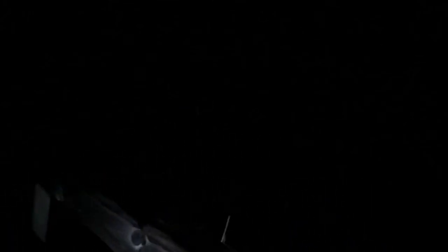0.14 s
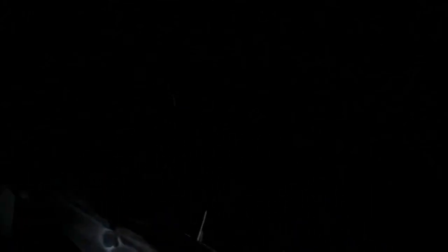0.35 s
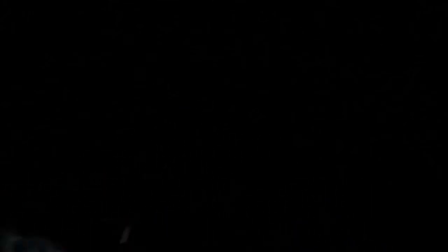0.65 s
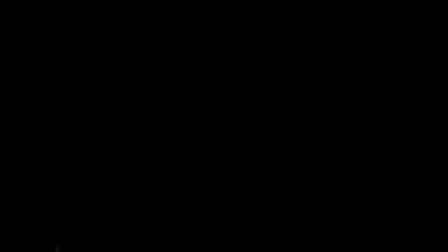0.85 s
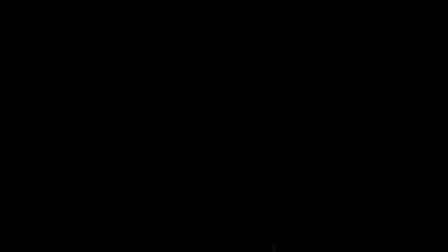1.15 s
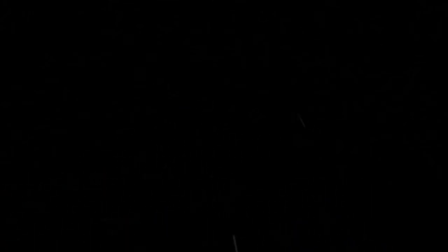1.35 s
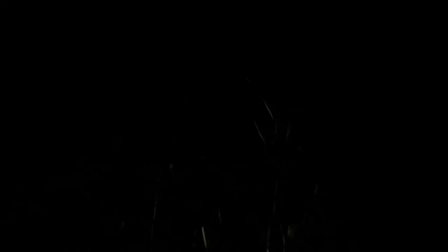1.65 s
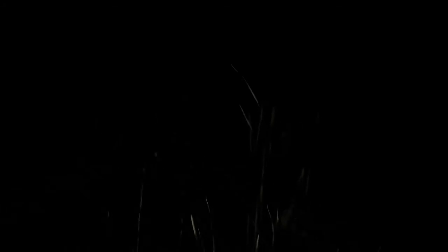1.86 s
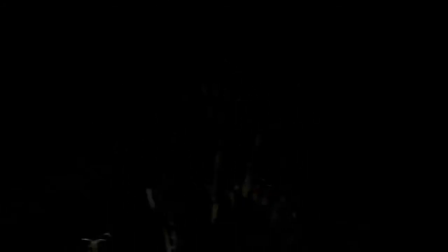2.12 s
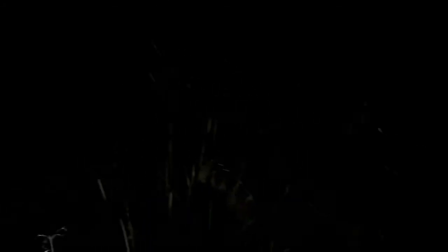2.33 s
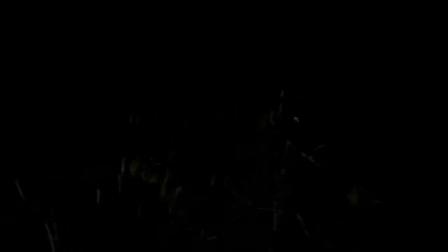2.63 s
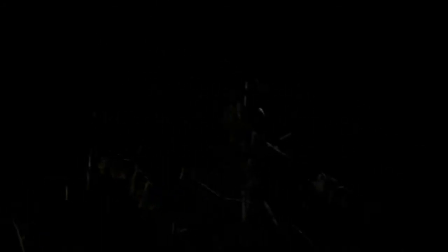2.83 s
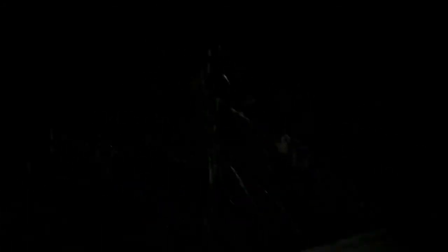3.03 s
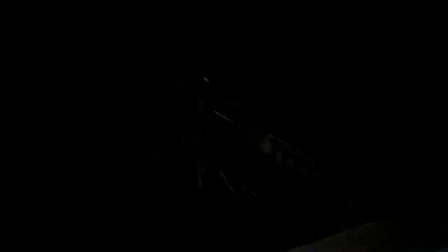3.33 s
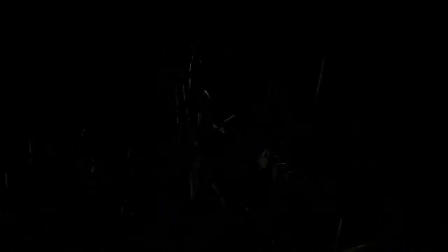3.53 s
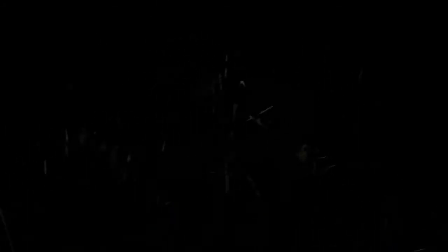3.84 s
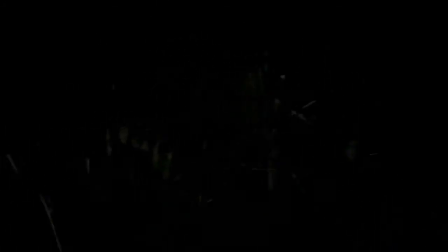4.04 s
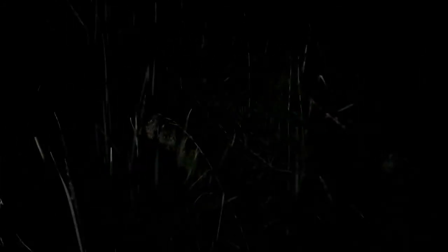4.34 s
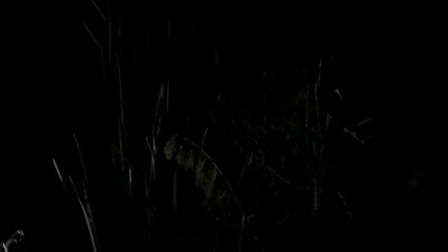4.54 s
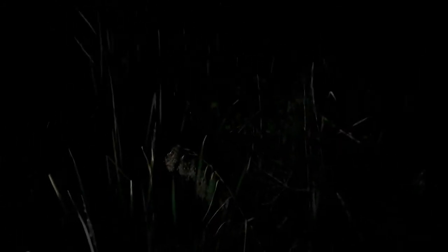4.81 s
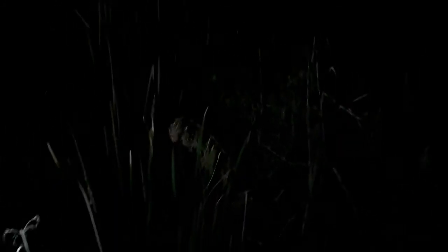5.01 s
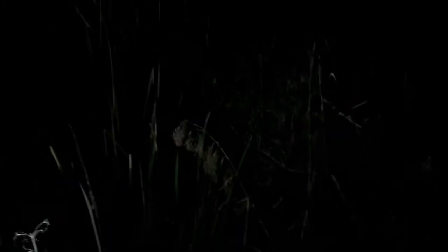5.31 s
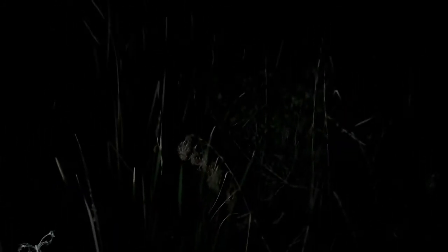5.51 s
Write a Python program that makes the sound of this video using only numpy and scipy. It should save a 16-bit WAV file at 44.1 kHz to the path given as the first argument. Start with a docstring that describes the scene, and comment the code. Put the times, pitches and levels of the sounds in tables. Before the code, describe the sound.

A close, dry, handheld night recording in tall grass and brush. At 0 to 0.2 seconds a bright stem snap and a weaker one crack through a short rustle, over shrill pulsing crickets that then sink away. Faint scrapes and soft bumps follow around 0.7 to 1.2, with a small crack and thud at 1.3. At 1.7 comes the loudest event, a tight burst of sharp splintering snaps, grass fizz and a low jolt, with another cluster at 1.93. Crickets surge up around it. From 2.1 to 2.8 only small knocks and hand rumble. Light straw ticks and scraping start at 3.1; a woody knock with a thud and crunch lands at 3.5, smaller ticks at 3.74. Small snaps come at 4.0, and a dull low distant rush swells at 4.2 to 4.5. Crickets thin out near 5.2; a faint tick at 4.9 and a last small snap at 5.3.

```python
"""Someone steps through tall grass and brush at night with a camera in hand: dry stems snap, twigs knock and
scrape, straw ticks, feet and hands thud. Each hit is a short blow of noise and echoes ringing in a body filter.
Shaped noise makes the rustle of leaves and grass and the rumble of the hand on the camera. Behind, pulsed tones
make four near crickets and a far chorus, and shaped noise a low distant rush and still air.
The camera's noise suppressor holds this background down and lets it surge after each close sound."""
import sys
import numpy as np
from scipy import signal
from scipy.fft import rfft, irfft, next_fast_len
from scipy.io import wavfile
from scipy.ndimage import uniform_filter1d

SR = 44100
rng = np.random.default_rng(int(sys.argv[2]) if len(sys.argv) > 2 else 0)


def unload_wav(signal):
    """Save mono or channel-first audio to the path in sys.argv[1] as 16-bit WAV at rate SR, clipped to [-1, 1]."""
    wavfile.write(
        sys.argv[1],
        SR,
        np.round(np.clip(np.atleast_2d(signal).T, -1, 1) * 32767).astype(np.int16),
    )


N = 249914
TIME = np.arange(N) / SR


def amp(db):
    """Turns decibels into a gain."""
    return 10 ** (np.asarray(db) / 20)


def unit(x):
    """Scales a signal to an average (rms) strength of 1."""
    return x / np.sqrt(np.mean(x ** 2) + 1e-20)


def curve(table):
    """Joins the (time, value) rows of a table by straight lines."""
    times, values = np.transpose(table)
    return np.interp(TIME, times, values)


def shape(points, hz):
    """Reads a table of (frequency, level) at any frequency, on a log-frequency axis."""
    point_hz, point_db = np.transpose(points)
    return np.interp(np.log(hz + 1), np.log(point_hz + 1), point_db)


def add(mix, start_s, sound):
    """Mixes a sound in at its start time."""
    part = mix[max(round(start_s * SR), 0):][:len(sound)]
    part += sound[:len(part)]


def coloured(x, points):
    """Weights the frequencies of a signal by a table, at rms 1."""
    size = next_fast_len(N, True)
    gain = amp(shape(points, np.fft.rfftfreq(size, 1 / SR)))
    return unit(irfft(rfft(x, size) * gain, size)[:N])


def band(centre_hz, width_hz):
    """Makes noise in one bell-shaped band; around zero it is a slow wander."""
    size = next_fast_len(N, True)
    offset = (np.fft.rfftfreq(size, 1 / SR) - centre_hz) / width_hz
    bell = np.exp(-2 * np.minimum(offset ** 2, 20))
    return unit(irfft(rfft(rng.standard_normal(size)) * bell, size)[:N])


def ring(x, gain_db, size=4096):
    """Filters a blow through a body that answers only after it is struck (minimum phase)."""
    log_gain = np.log(amp(np.maximum(gain_db, -100)))
    mirrored = np.r_[log_gain, log_gain[-2:0:-1]]
    response = np.fft.ifft(np.exp(np.conj(signal.hilbert(mirrored)))).real
    return signal.fftconvolve(x, response[:size // 2])


def overtones(size, spacing_hz=450, uneven_db=4.5):
    """Gives every struck body its own uneven row of resonances, in dB over frequency."""
    knots = np.arange(size // 2 + 1) * SR / size / spacing_hz
    places = np.interp(knots, np.arange(200), np.arange(200) + rng.random(200))
    return uneven_db * np.cos(2 * np.pi * places)


# echoes from the hand and things close by: (delay_s, share of the pressure)
ECHOES = [(0, 1), (.00052, .5), (.0017, .17), (.0027, -.13), (.0037, .1)]


def hits(rows, body, main_hz, side_hz, ring_db, ring_octaves, splinter, splinter_t60, tail_db, tail_t60, size=4096):
    """Each hit is a sharp impulse with close echoes, a burst of splintering and a tail, all ringing in the body."""
    hz = np.fft.rfftfreq(size, 1 / SR)
    t = np.arange(2 * size) / SR
    out = np.zeros(N)
    main, side = ((hz > low) & (hz < high) for low, high in (main_hz, side_hz))
    reach = uniform_filter1d(side * 1., size=41)  # the side band with soft edges
    for start_s, peak_db, ring_hz, side_db in rows:
        octaves_off = np.log2((hz + 1) / ring_hz)
        peak = ring_db * np.exp(-.5 * (octaves_off / ring_octaves) ** 2)
        colour_db = shape(body, hz) + overtones(size) + peak
        # thick and thin stems differ in how much sounds outside their main ring
        power = amp(colour_db) ** 2
        present_db = 10 * np.log10(power[side].sum() / power[main].sum())
        colour_db = colour_db + reach * np.clip(side_db - present_db, -12, 6)

        # each noise burst falls by 60 dB in its t60, in seconds
        t60 = np.array([[splinter_t60], [tail_t60]])
        fibres, tail = rng.standard_normal((2, len(t))) * np.exp(-np.log(1000) * t / t60)
        blow = splinter * fibres / np.linalg.norm(fibres)
        blow += amp(tail_db) * tail / np.linalg.norm(tail)
        for delay_s, share in ECHOES:
            add(blow, delay_s, np.array([share]))

        sound = ring(blow, colour_db)
        crest = np.sqrt(2 * uniform_filter1d(sound ** 2, size=32).max())  # height of the loudest few swings
        add(out, start_s, amp(peak_db) * sound / crest)
    return out


# dry stems snapping: (start_s, peak_db before the layer level, ring_hz, wanted low thud_db against the ring)
SNAPS = [(0.0175, -7.5, 5870, -17.5), (0.172, -17.5, 5630, -15.5), (0.1882, -30, 5550, 3),
         (1.2795, -27, 5050, -8), (1.3209, -35.5, 5500, 0), (1.7274, 0, 5314, -20), (1.7387, -8, 7200, -15),
         (1.7415, -14, 5230, -7), (1.7491, -14.5, 5840, -15), (1.928, -15.5, 5370, -18),
         (1.9363, -27, 4800, -10), (1.9559, -22, 6900, -9), (4.001, -23, 4450, -24),
         (4.0039, -32, 5230, -16), (5.3261, -28, 4400, -20.5)]
# how a snapping stem colours the blow: (pitch_hz, level_db per Hz)
SNAP_BODY = [(60, -26.5), (250, -22), (500, -21), (900, -3.5), (1500, -17), (2500, -13.5), (3200, -7.5),
             (3850, -3.5), (4400, -4), (5150, 3.5), (6200, -10.5), (7000, -5), (8200, -12), (9000, -34),
             (12000, -42.5), (16000, -51)]


def snaps(level_db=-0.5, warning_db=-25, warning_s=0.0027):
    """A stem gives a faint crack just before it breaks with a bright ring."""
    breaks = hits(SNAPS, SNAP_BODY, main_hz=(3000, 9000), side_hz=(300, 2000), ring_db=8, ring_octaves=.25,
                  splinter=.3, splinter_t60=.014, tail_db=-13.5, tail_t60=0.1)
    warnings = amp(warning_db) * np.roll(breaks, -round(warning_s * SR))  # faint early copies
    return amp(level_db) * (breaks + warnings)


# twigs knocking: (start_s, peak_db, ring_hz, wanted crack_db against the ring)
KNOCKS = [(0.673, -52.5, 1400, -16), (1.006, -51, 1110, 3), (1.1515, -46, 750, 1), (1.279, -28, 820, -20.5),
          (1.542, -53, 870, -35), (1.709, -40, 930, 10), (1.747, -26, 800, -9.5), (1.832, -46, 890, -12),
          (1.855, -45, 765, -15), (1.863, -38, 750, -7), (2.109, -44, 1440, 6), (2.3185, -42.5, 1870, 4.5),
          (3.216, -44, 1320, 2), (3.425, -53.5, 1390, -8), (3.515, -24.5, 933, -20), (3.746, -49, 954, 4)]
# how a twig colours the blow: (pitch_hz, level_db per Hz)
KNOCK_BODY = [(60, -20), (250, -4), (450, -14), (900, 5), (1300, -1), (2000, -5), (2800, -15.5),
              (4000, -5.5), (5500, -14), (8000, -36), (10000, -51)]


def knocks():
    """Thicker twigs ring lower and longer."""
    return hits(KNOCKS, KNOCK_BODY, main_hz=(500, 2600), side_hz=(3000, 5000), ring_db=8, ring_octaves=0.15,
                splinter=1.8, splinter_t60=.035, tail_db=0.5, tail_t60=0.083)


# straw ticking: (start_s, peak_db before the layer level, ring_hz, wanted lower crack_db against the ring)
TICKS = [(0.1423, -45, 7140, 15), (0.2894, -47.5, 9250, -12), (0.951, -62, 11700, -4.5),
         (1.1515, -48, 6400, 4), (1.678, -46, 6720, -17), (1.7495, -17, 10560, -7),
         (1.8394, -34, 11600, -11), (1.8621, -33, 6760, -16), (1.9634, -20.5, 7600, 1.5),
         (1.9757, -39.5, 9380, -17), (2.155, -47.5, 6850, -24), (2.2546, -53, 6620, -30.5),
         (2.4618, -52, 6550, -14.5), (3.0734, -40.5, 7530, 0), (3.0861, -35.5, 8000, -4),
         (3.1038, -33.5, 7160, -19.5), (3.1686, -45.5, 6560, 8), (3.2169, -37.5, 9900, -8),
         (3.5384, -36, 8110, -18), (3.5444, -38, 6560, -16), (3.5564, -31.5, 7710, -4),
         (3.5712, -37.5, 9300, 7), (3.736, -47, 6600, 2), (3.7452, -33.5, 6200, 3), (3.7648, -42, 6620, -6),
         (4.0414, -50, 6570, -0.5), (4.0572, -43.5, 6470, 2.5), (4.134, -51, 6520, -6.5),
         (4.1458, -47, 6860, -10), (4.5055, -58, 6800, -18.5), (4.816, -67, 4600, 5),
         (4.8805, -53, 6660, -13.5), (4.9015, -49, 6690, -15)]
# how straw colours the blow: (pitch_hz, level_db per Hz)
TICK_BODY = [(300, -27.5), (1500, -26.5), (3200, -3), (4500, 3), (6500, 0), (8200, -9.5), (9500, -10),
             (12500, -15.5), (15000, -26.5)]


def ticks(level_db=-2):
    """Thin straw ticks briefly and brightly."""
    sound = hits(TICKS, TICK_BODY, main_hz=(6500, 14000), side_hz=(2000, 4600), ring_db=8, ring_octaves=0.2373,
                 splinter=1.0, splinter_t60=0.0054, tail_db=-13.0, tail_t60=0.079)
    return amp(level_db) * sound


# soft thuds of feet and hands: (start_s, peak_db before the layer level, ring_hz, wanted knock_db against the ring)
THUDS = [(0.169, -41.5, 227, -2), (1.005, -53, 236, -8), (1.279, -42.5, 276, -4), (1.374, -47, 280, -1),
         (1.689, -47.5, 231, -12), (1.725, -31.5, 270, 3), (1.857, -37, 236, -18), (1.923, -38.5, 225, -3),
         (1.955, -37.5, 388, 5), (2.334, -51, 299, -6), (2.762, -54, 310, -15), (3.166, -62, 397, -5),
         (3.478, -44.5, 379, -18), (3.517, -34, 198, 3), (3.632, -42, 237, -20.5), (3.736, -43.5, 227, -5)]
# how soft ground colours the blow: (pitch_hz, level_db per Hz)
THUD_BODY = [(60, -14.5), (140, -6.5), (220, 1), (380, -6), (560, -9.5), (900, -13.5), (1500, -30.5),
             (4000, -52.5)]


def thuds(level_db=-2):
    """Weight comes down on soft ground: a low, lumpy ring."""
    sound = hits(THUDS, THUD_BODY, main_hz=(150, 450), side_hz=(600, 1200), ring_db=9.5, ring_octaves=0.39,
                 splinter=1.9, splinter_t60=0.048, tail_db=0.0, tail_t60=.16)
    return amp(level_db) * sound


# twigs scraping past: (start_s, length_s, level_db before fade and judder, pitch_hz, width_hz)
SCRAPES = [(0.669, 0.11, -72.5, 1620, 497), (0.818, 0.52, -79.5, 1150, 330), (1.017, 0.26, -65, 1070, 380),
           (1.003, 0.45, -76, 3510, 600), (1.163, 0.56, -66, 880, 450), (1.39, 0.11, -65.5, 6630, 900),
           (1.67, 0.36, -58.5, 800, 1090), (1.849, 0.083, -53.5, 700, 1410),
           (2.313, 0.14, -66.5, 1321, 2230), (2.5, 0.46, -83, 2104, 220), (3.06, 0.34, -67.5, 2950, 900),
           (4.535, 0.082, -75, 4406, 1403), (4.879, 0.089, -59, 6080, 1200)]


def scrapes(judder_db=3, rise=0.023):
    """A twig catches, then sticks and slips ever more lightly as it slides by, sounding in one band."""
    total = 0
    for start_s, length_s, level_db, pitch_hz, width_hz in SCRAPES:
        progress = (TIME - start_s) / length_s  # 0 at the start, 1 at the end
        pressure = np.interp(progress, [0, rise, .5, 1], [0.02, 0.89, 0.32, 0])
        total = total + amp(level_db) * pressure * band(pitch_hz, width_hz)
    return total * amp(judder_db * band(0, 150))


# pushes through the brush, levels before the layer gains:
# (start_s, length_s, leaves_db, dry grass_db, jolt of the camera_db)
PUSHES = [(0.017, 0.21, -65, -68.5, -58), (0.666, 0.023, -86.5, -89, -63.5), (0.98, 0.17, -79, -105, -67),
          (1.276, 0.056, -65, -92, -58.5), (1.707, 0.088, -62.5, -59, -50.5),
          (1.925, 0.039, -60, -58.5, -50.5), (2.127, 0.06, -76, -80, -71.5),
          (2.333, .02, -73.5, -99, -58.5), (3.088, 0.21, -80.5, -77.5, -65.5),
          (3.51, 0.078, -61, -69.5, -48), (3.732, 0.029, -71.5, -72, -60.5),
          (4.004, 0.039, -74.5, -75, -76), (4.137, .02, -83, -78, -60), (4.883, 0.022, -102, -84, -70),
          (5.324, 0.032, -78, -79, -72.5)]
PUSH_RISE_DB_PER_S = 648.5


def pushed(column, fall_db_per_s):
    """Gain of one layer: each push sets in quickly, lasts a moment and dies away evenly in dB."""
    power = 0
    for start_s, length_s, *levels_db in PUSHES:
        early_s = np.maximum(start_s - TIME, 0)
        late_s = np.maximum(TIME - start_s - length_s, 0)
        level_db = levels_db[column] - PUSH_RISE_DB_PER_S * early_s - fall_db_per_s * late_s
        power = power + amp(level_db) ** 2
    return np.sqrt(power)


def crinkle(per_s, spread_db, smooth):
    """Many tiny slips of uneven size come over a smooth rubbing noise."""
    slip_size = amp(spread_db * np.minimum(rng.exponential(1, N), 4))
    happens = rng.random(N) < per_s / SR
    slips = rng.standard_normal(N) * slip_size * happens
    return unit(slips) + smooth * rng.standard_normal(N)


# colour of the rustling leaves: (pitch_hz, level_db per Hz)
LEAVES = [(100, -4), (250, 10), (500, 4.5), (900, 12.5), (1300, 4), (2000, -3.5), (3000, -6), (4200, 2),
          (6000, -2.5), (7500, -17.5), (9000, -34)]


def leaf_rustle(level_db=6):
    """Leaves rub past with each push, slipping often."""
    noise = coloured(crinkle(per_s=610, spread_db=4.5, smooth=0.87), LEAVES)
    return amp(level_db) * pushed(0, fall_db_per_s=91.5) * noise


# colour of the dry grass: (pitch_hz, level_db per Hz)
GRASS = [(5000, -19.5), (6800, 11), (7800, -3), (9000, 4), (10200, -5), (12000, -7.5), (13300, -9.5),
         (15000, -31)]


def grass_fizz():
    """Dry grass rubs past with each push, as a bright and smoother fizz."""
    return pushed(1, fall_db_per_s=160) * coloured(crinkle(per_s=340, spread_db=8, smooth=3.2), GRASS)


# hand moving on the camera, which comes to rest near the end: (time_s, level_db before the layer gain)
HANDLING = [(0, -71.5), (2.2, -68.5), (2.62, -63), (2.9, -78), (4.2, -73.5), (4.7, -87), (5.2, -91),
            (5.67, -86.5)]
# colour of the rumble: (pitch_hz, level_db per Hz)
RUMBLE = [(12, -7.5), (28, -2), (45, 2), (70, -4), (110, -14.5), (170, -24), (400, -58)]


def hand_rumble(level_db=-1, lumpy_db=3):
    """The hand rumbles unevenly on the camera, with a jolt at each push."""
    grip = amp(curve(HANDLING) + lumpy_db * band(0, 21))
    strength = np.hypot(grip, pushed(2, fall_db_per_s=126))
    return amp(level_db) * strength * coloured(rng.standard_normal(N), RUMBLE)


def scatter(x, t60, wet_db):
    """Stems and leaves add a short cloud of echoes, falling by 60 dB in t60 seconds."""
    t = np.arange(SR // 3) / SR
    tail = rng.standard_normal(len(t)) * np.exp(-np.log(1000) * t / t60)
    echoes = signal.fftconvolve(x, tail / np.linalg.norm(tail))[:N]
    return unit(x + amp(wet_db) * echoes)


def trill(pitch_hz, rate, stroke_s, fall_hz, duty=0.49):
    """Each closing of the wings draws the scraper over the file: a short, slightly raspy tone that sinks in pitch."""
    slip, waver_hz, uneven_db, rasp = .03, 60, 1.2, .38
    place = ((TIME - stroke_s) * rate + slip * band(0, 4.4) + .5) % 1 - .5  # 0 in mid-stroke
    stroke = np.cos(np.pi * np.clip(place / duty, -.5, .5))
    pitch = pitch_hz - fall_hz * place / duty + waver_hz * band(0, 300)
    tone = np.sin(2 * np.pi * np.cumsum(pitch) / SR)
    teeth = 1 + rasp * band(0, 580)  # the teeth of the file catch unevenly
    return unit(stroke * teeth * amp(uneven_db * band(0, 27)) * tone)


# bouts in which a near cricket stands out, one list per cricket:
# (middle_s, half_length_s, level_db against the chorus, added to the gain between bouts)
BOUTS = [
    [(1.22, .13, -1), (2.8, .33, 1.5)],
    [(0, .3, -6.5), (4.5, 1.3, -6.5)],
    [(.7, .45, -2.5)],
    [(1.4, .35, -8), (4.6, .2, -8)],
]
BETWEEN_BOUTS_DB = -12.5


def prominence(bouts):
    """Gain of one cricket: it rises smoothly out of the chorus for each bout and sinks back."""
    gain = amp(BETWEEN_BOUTS_DB)
    for middle_s, half_s, level_db in bouts:
        gain = gain + amp(level_db) * np.exp(-((TIME - middle_s) / half_s) ** 2)
    return gain


# near crickets: (pitch_hz, strokes per s, middle of one stroke_s, fall of pitch in a stroke_hz)
CRICKETS = [(5530, 33.9, 2.711, 120), (5450, 29.7, 4.673, 380), (5220, 42, .748, 120),
            (5800, 25.3, 1.585, 450)]


def near_crickets():
    """Four near crickets pulse clearly, each with its own bouts."""
    songs = [scatter(trill(*row), t60=.05, wet_db=-7) for row in CRICKETS]
    return sum(prominence(bouts) * song for bouts, song in zip(BOUTS, songs))


# colour of the far insects: (pitch_hz, level_db per Hz)
CHORUS = [(3000, -56), (4000, -39), (4400, -36), (4750, -10.5), (5050, -7.5), (5330, -4), (5550, 1.5),
          (5760, -5), (5950, -10), (6250, -12), (6450, -18.5), (7000, -24.5), (7700, -44), (8500, -52)]


def far_chorus(count=9):
    """Farther crickets blur into a shrill haze of echoing trills and noise."""
    trills = 0
    for pitch_hz in np.linspace(5050, 6100, count):
        song = trill(pitch_hz, rng.uniform(27, 45), rng.random(), fall_hz=200)
        trills = trills + amp(shape(CHORUS, pitch_hz)) * song
    haze = coloured(rng.standard_normal(N), CHORUS)
    return amp(-6) * scatter(trills, t60=.1, wet_db=-3) + amp(-6) * haze


# slow swell of the whole insect chorus: (time_s, level_db)
SWELL = [(0, -50.5), (.8, -55.5), (.9, -61.5), (1.1, -66), (1.22, -58.5), (1.8, -48), (2.25, -56.5),
         (2.78, -53.5), (3.06, -64), (3.3, -53.5), (3.8, -53.5), (4.66, -51), (4.82, -62), (5.2, -76.5),
         (5.35, -60.5), (5.67, -61.5)]
# far insects that drone without a break: (pitch_hz, width_hz, level_db against the chorus)
DRONES = [(6262, 18, -19), (6150, 170, -14), (9400, 70, -34)]


def insects(drone_follow=.7):
    """Near and far crickets swell together; steady narrow-band drones follow the swell only in part."""
    swell_db = curve(SWELL)
    drones = sum(amp(level_db) * band(pitch_hz, width_hz) for pitch_hz, width_hz, level_db in DRONES)
    drone_db = swell_db.mean() + drone_follow * (swell_db - swell_db.mean())
    return amp(swell_db) * (near_crickets() + far_chorus()) + amp(drone_db) * drones


# swells of the distant rush: (crest_s, level_db, rise and fall time_s)
SURGES = [(.92, -72.5, 0.085), (2.2, -70, 0.13), (2.78, -64.5, 0.17), (3.24, -69.5, 0.11),
          (4.199, -57, 0.37), (4.44, -58.5, .13), (5.67, -60, 0.13)]
# colour of the rush when faint, and when loud: (pitch_hz, level_db per Hz)
RUSH_FAINT = [(100, -28), (200, -14), (270, -8), (340, 0), (430, -2.5), (600, -11.5), (900, -24.5),
              (1500, -24), (3000, -54.5)]
RUSH_LOUD = [(100, -17), (240, -10.5), (340, -6.5), (460, 3.5), (600, -1.5), (800, -6.5), (1100, -31),
             (1600, -73), (3000, -71)]


def rush(lumpy_db=0.5, rest_db=-83, faint_db=-66, loud_db=-57):
    """A dull, distant rush of noise brightens as it swells."""
    power = amp(rest_db) ** 2
    for crest_s, crest_db, span_s in SURGES:
        power = power + (amp(crest_db) * np.exp(-abs(TIME - crest_s) / span_s)) ** 2
    level_db = 10 * np.log10(power)
    bright = np.clip((level_db - faint_db) / (loud_db - faint_db), 0, 1)
    noise = rng.standard_normal(N)
    blend = (1 - bright) * coloured(noise, RUSH_FAINT) + bright * coloured(noise, RUSH_LOUD)
    return amp(level_db + lumpy_db * band(0, 20)) * blend


# colour of still night air: (pitch_hz, level_db per Hz)
AIR = [(100, 0), (400, 0.5), (1000, 2), (2200, 1), (3300, -1.5), (6000, -7), (8000, -13.5), (12000, -19)]


def night_air(level_db=-83.5):
    """Still air is a faint, steady noise."""
    return amp(level_db) * coloured(rng.standard_normal(N), AIR)


def suppressor(near, suppress_db=8, shut_db=-85.5, open_db=-56, release_s=0.24):
    """Gain for the background: a noise suppressor opens fast for close sounds and shuts slowly after them."""
    highpass = signal.butter(2, 1500, "highpass", fs=SR, output="sos")
    heard = signal.sosfilt(highpass, near)
    power = abs(uniform_filter1d(heard ** 2, size=441))  # averaged over 10 ms
    level_db = 10 * np.log10(power + 1e-14)
    opening = np.clip((level_db - shut_db) / (open_db - shut_db), 0, 1)
    # follows every rise, then falls from open to shut in release_s
    held = np.maximum.accumulate(opening + TIME / release_s) - TIME / release_s
    return amp(-suppress_db * (1 - uniform_filter1d(held, size=441)))


def scene():
    """The brush is close by, insects and distance behind; the background surges after close sounds."""
    near = snaps() + knocks() + ticks() + thuds() + scrapes()
    near = near + leaf_rustle() + grass_fizz() + hand_rumble()
    background = insects() + rush() + night_air()
    return (near + suppressor(near) * background)[None]


def record(dry, edge_hz=14800):
    """Peaks are clipped at full scale; then a steep filter takes away the treble above the edge."""
    lowpass = signal.firwin(255, edge_hz, window=("kaiser", 8), fs=SR)
    return signal.oaconvolve(np.clip(dry, -1, 1), lowpass[None], "same")


dry = scene()
out = record(dry)
unload_wav(out)
```